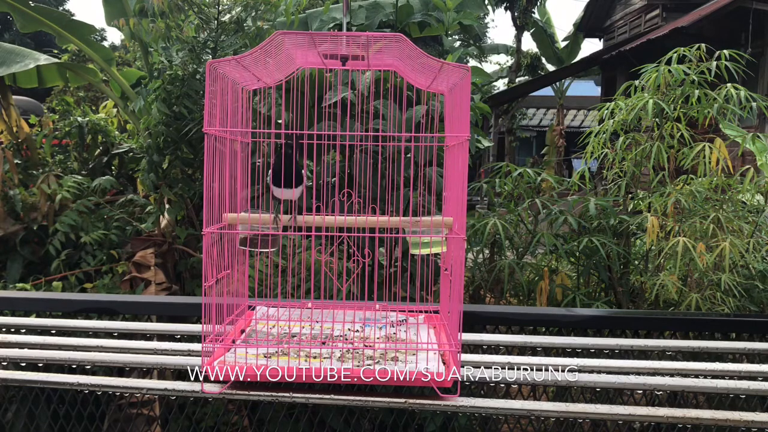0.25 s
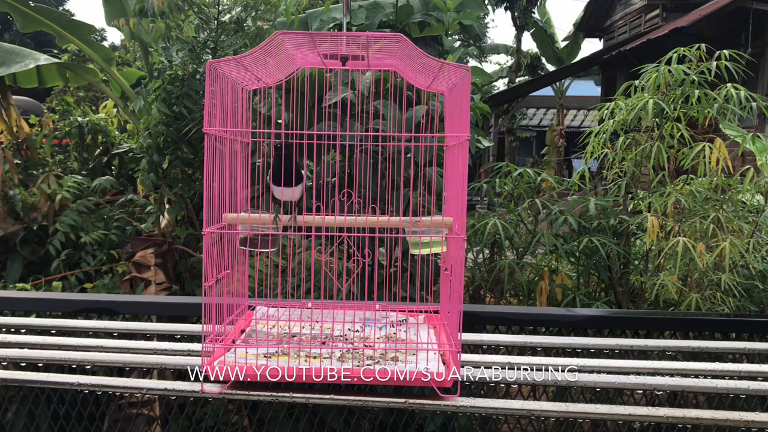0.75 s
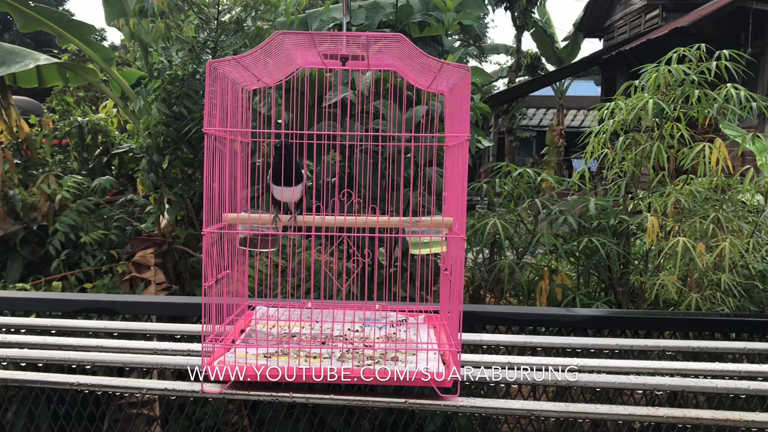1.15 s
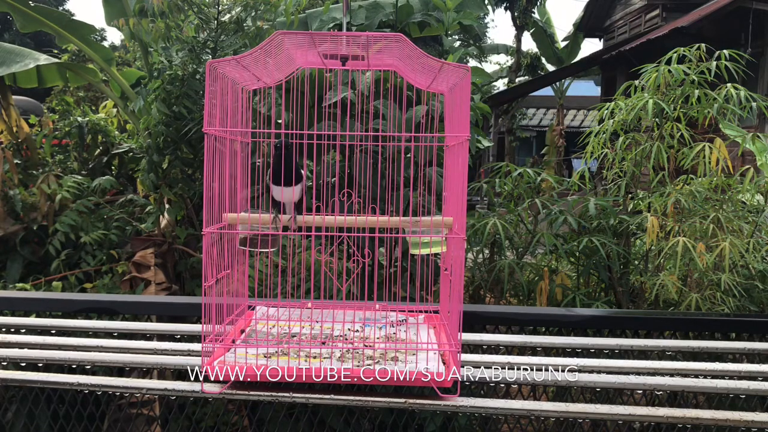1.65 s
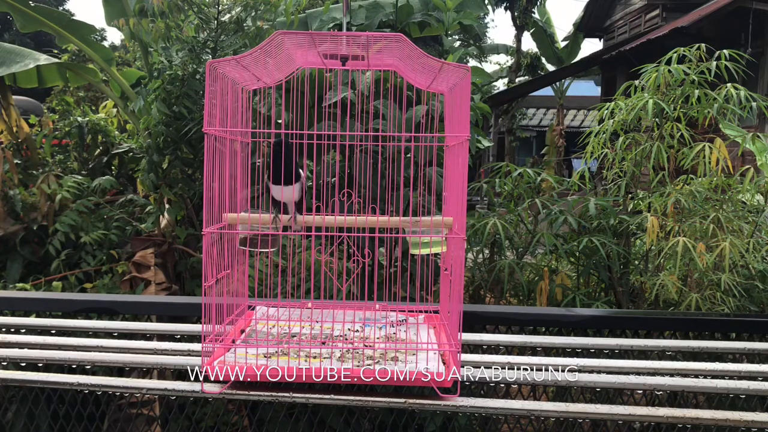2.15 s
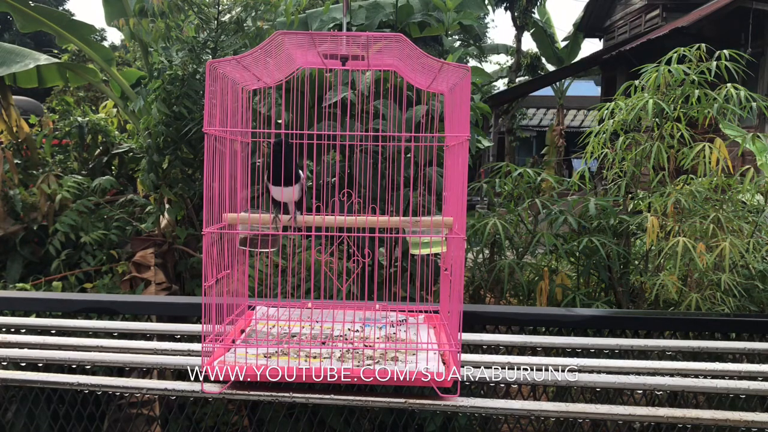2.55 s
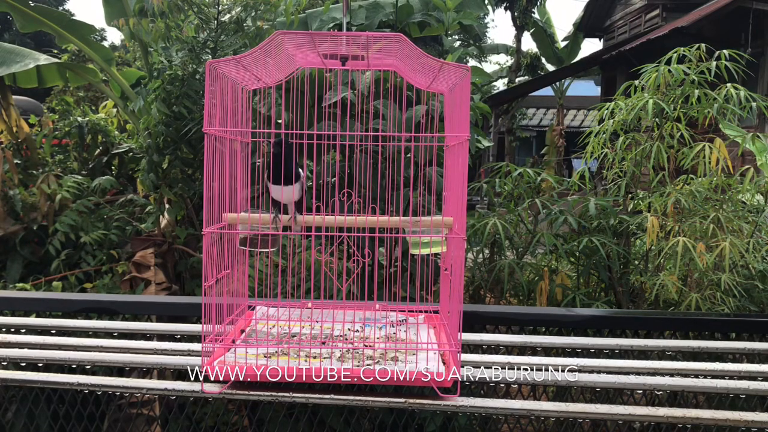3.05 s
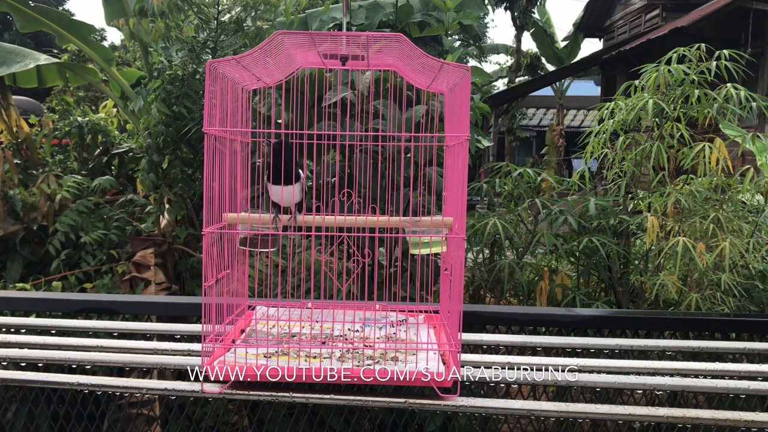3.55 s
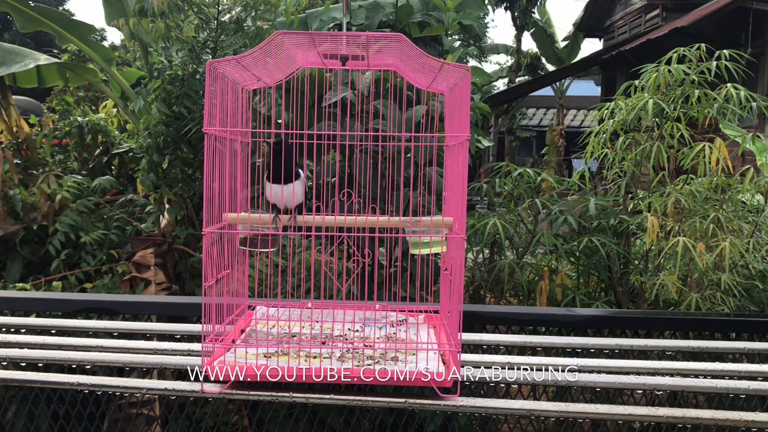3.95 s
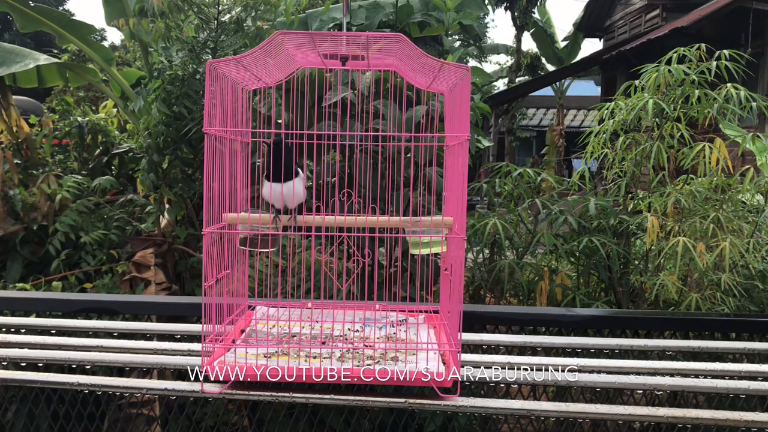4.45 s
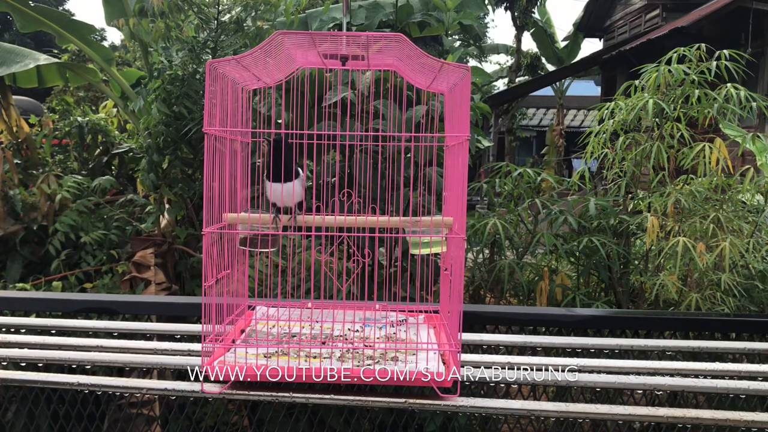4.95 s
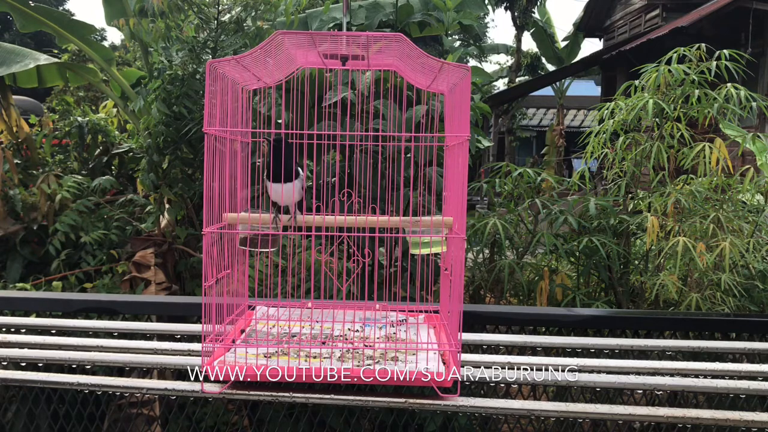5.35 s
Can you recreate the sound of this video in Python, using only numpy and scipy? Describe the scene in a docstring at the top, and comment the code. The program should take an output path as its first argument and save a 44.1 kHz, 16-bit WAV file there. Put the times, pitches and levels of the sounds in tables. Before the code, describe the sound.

Bright, fast whistles and warbles from a caged songbird outdoors, followed by one soft swish above a low, faraway traffic hum.

```python
"""A garden, one microphone a few metres from a caged magpie-robin singing one quick phrase.
The two sides of its syrinx whistle in turn and overlap, which adds sum and difference tones;
some notes flutter or rasp. The cage reflects them closely; house and foliage give a faint echo.
Distant traffic drones throughout, another bird calls far off, and one soft swish follows the song."""
import sys
import numpy as np
from scipy import signal
from scipy.fft import rfft, irfft, next_fast_len
from scipy.io import wavfile

SR = 44100
rng = np.random.default_rng(int(sys.argv[2]) if len(sys.argv) > 2 else 0)


def inscribe(sig):
    """Save sig as 16-bit PCM at rate SR to the path in sys.argv[1].

    A 1-D sig is mono; a 2-D sig holds one channel per row.
    Samples are clipped to [-1, 1] before scaling.
    """
    pcm = np.round(np.clip(np.atleast_2d(sig).T, -1, 1) * 32767)
    wavfile.write(sys.argv[1], SR, pcm.astype(np.int16))


N = 246959
TIME = np.arange(N) / SR


def undb(db):
    """Decibels to gain."""
    return 10 ** (np.asarray(db) / 20)


def curve(rows):
    """Rows of (time_s, value) joined by straight lines."""
    return np.interp(TIME, *np.transpose(rows))


def gain_at(hz, colour):
    """Gain of a (freq_hz, gain_db) spectrum at the given frequencies."""
    freq_hz, gain_db = np.transpose(colour)
    return undb(np.interp(np.log(np.maximum(hz, 1)), np.log(freq_hz), gain_db))


def gate(start, end, edge_s):
    """One between start and end, with smooth edges."""
    inside_s = np.minimum(TIME - start, end - TIME)
    return np.sin(np.pi / 2 * np.clip(inside_s / edge_s + .5, 0, 1)) ** 2


def wander(hz):
    """Unit random motion, slower than hz."""
    motion = signal.sosfilt(signal.butter(4, hz, fs=SR, output="sos"), rng.standard_normal(N + SR))[SR:]
    return motion / motion.std()


def noise(colour):
    """Unit noise with a (freq_hz, gain_db) colour, falling away below the first point."""
    size = next_fast_len(N)
    hz = np.arange(size // 2 + 1) * SR / size
    low_cut = np.minimum(hz / colour[0][0], 1) ** 2
    coloured = irfft(rfft(rng.standard_normal(size)) * gain_at(hz, colour) * low_cut, size)[:N]
    return coloured / coloured.std()


# Spectrum of the traffic, far from the garden: freq_hz, relative_db
RUMBLE_COLOUR = [(15, -41.5), (25, -15), (54, -4), (165, -2.5), (192, -8), (299, -13), (320, -14),
                 (350, -17), (488, -24), (521, -21.5), (794, -25.5), (1010, -20.5), (1930, -32),
                 (3000, -33), (5000, -40.5), (6500, -70), (11000, -120)]
# Tones of one distant engine: pitch_hz, relative_db
ENGINE_TONES = [(65, -55.5), (98, -54.5), (164, -61), (530, -73)]
# That engine's rise and fall at the microphone: time_s, gain_db
ENGINE_SWELL = [(0, 4), (.8, -16.5), (1.2, 3), (4.3, 6), (4.7, 0.5), (5.6, -3.5)]


def distant_traffic(rumble_db=-47.94, sway_db=.5, speed_drift=.0069, engine_db=-1):
    """A swaying rumble and a far engine whose tones drift together with its speed."""
    engine_time = np.cumsum(1 + speed_drift * wander(4)) / SR
    engine = sum(undb(db + 1.4 * wander(4.5)) * np.sqrt(2) * np.sin(2 * np.pi * hz * engine_time)
                 for hz, db in ENGINE_TONES)
    rumble = noise(RUMBLE_COLOUR) * undb(rumble_db - sway_db * wander(2.7))
    return rumble + engine * undb(engine_db + curve(ENGINE_SWELL))


# Spectrum of the garden's background hiss: freq_hz, relative_db
HISS_COLOUR = [(4000, -23.5), (5000, 3.5), (6500, 1), (7500, -1), (8600, -1), (9500, 6), (10500, -7.5),
               (11500, -0.5), (13000, 9), (14500, -2), (15700, -12)]


def hiss(level_db=-67):
    """A smooth, steady hiss high above the traffic."""
    return noise(HISS_COLOUR) * undb(level_db)


def whistle(start, end, first_hz, middle_hz, last_hz, db, attack_s, release_s, swell_db):
    """One arc of pitch on one breath: the samples it covers, its pitch and its amplitude."""
    on = np.flatnonzero((TIME > start) & (TIME < end))
    since, left = TIME[on] - start, end - TIME[on]
    along = since / (end - start)
    arc_hz = np.polyval(np.polyfit([0, .5, 1], [first_hz, middle_hz, last_hz], 2), along)
    scoop_hz = 147.5 * np.exp(-since / .004)  # flat while the air pressure builds
    sag_hz = 173 * np.exp(-left / .0045)  # flat again as it drops
    rise = np.sin(np.pi / 2 * np.minimum(since / attack_s, 1))
    fall = np.sin(np.pi / 2 * np.minimum(left / release_s, 1))
    return on, arc_hz - scoop_hz - sag_hz, rise * fall * undb(db + swell_db * (along - .5))


# The caged bird, a few metres away; notes of the low and high sides of its syrinx:
# start_s, end_s, start_hz, middle_hz, end_hz, level_db, attack_s, release_s, swell_db,
# overtones_db (before throat and beak), slope_db_per_harmonic
LOW_NOTES = [ (.028, .124, 3640, 3682, 3770, -18, 0.048, 0.017, -4, -11, -2),
             (.415, .438, 2670, 2920, 3010, -26.5, 0.046, 0.013, 11.5, 5, -7.5),
             (.458, .649, 2997, 3285, 3440, -18, 0.034, 0.023, 8.5, -9.5, -2.5),
             (.721, .848, 2817, 2474, 2584, -25, 0.056, 0.013, -2, -5.5, 0.5),
             (1.133, 1.168, 2800, 2600, 2655, -29.5, 0.025, 0.0036, -3.5, 1.5, -3.5),
             (1.172, 1.228, 2400, 2142, 2120, -29, .006, .014, -2.5, -5, 0.5),
             (1.216, 1.324, 2170, 2205, 2257, -30, 0.019, 0.029, -1, 2.5, 0),
             (1.706, 1.825, 1826, 2060, 1961, -26, 0.085, 0.042, 8, -3, 0.5),
             (1.909, 1.951, 1957, 2667, 2900, -27, 0.03, .0055, 11.5, 12, -1.5),
             (1.942, 1.986, 3340, 3157, 2506, -14.5, .015, .029, -2.5, -4.5, -6),
             (1.976, 2.098, 2879, 2722, 2887, -24.5, 0.0087, 0.0041, 4, -8.5, 1),
             (2.21, 2.294, 3297, 3392, 2706, -16.5, 0.03, .049, 12, -2.5, -2),
             (2.292, 2.372, 2160, 2241, 2154, -25.5, 0.016, 0.013, 1.5, -11, -0.5),
             (2.509, 2.587, 3115, 3577, 3797, -15.5, 0.048, 0.0043, 4.5, -3, -1.5),
             (2.583, 2.636, 3660, 3500, 3665, -17, 0.004, 0.0089, -4.5, 1.5, -1),
             (3.12, 3.18, 1940, 2082, 1983, -29, 0.037, .012, 1.5, -9, -3),
             (3.172, 3.291, 2204, 2294, 2453, -27.5, 0.013, .012, -2.5, -5.5, -1.5),
             (3.575, 3.718, 3704, 3703, 3754, -16, 0.04, 0.04, -3.5, -6.5, -0.5)]
HIGH_NOTES = [ (.078, .204, 4188, 4428, 4453, -17.5, 0.063, .028, 11.5, 1.5, -1.5),
              (.366, .39, 4230, 4200, 3940, -31, .014, 0.0084, 5, -2.5, 0),
              (.382, .485, 3760, 4040, 3880, -14.5, .08, 0.049, -7.5, -2.5, 1.5),
              (.468, .57, 3900, 3670, 3610, -28.5, .015, 0.0128, -2.5, -7.5, -12),
              (.583, .648, 3780, 3820, 3960, -38, .01, .008, 8, -1.5, -7),
              (.828, .928, 3485, 3293, 3550, -20, .033, .027, -7, -16, 0),
              (.909, 1.046, 3306, 3587, 3430, -17, .035, 0.03, -1.5, -10.5, -1),
              (1.224, 1.325, 2695, 3240, 3420, -26.5, .014, .0033, 10, -24, -10),
              (1.306, 1.479, 3444, 3442, 3575, -19, .033, 0.015, -1, -0.5, -3.5),
              (2.585, 2.779, 4370, 4391, 4476, -20.5, .004, 0.011, 3, 1.5, 7.5),
              (2.859, 2.916, 5420, 4800, 4700, -30, 0.0047, .008, 20, 10.5, -13),
              (2.908, 2.97, 4890, 4580, 3534, -21.5, .01, 0.0078, 8.5, 6.5, -2),
              (2.964, 3.016, 3710, 3625, 3630, -18, .016, 0.024, -3.5, -1, -1),
              (3.625, 3.712, 4640, 4420, 4333, -30.5, 0.025, 0.0099, 13, 5, -22),
              (3.704, 3.857, 4536, 4563, 4706, -20.5, 0.0095, 0.045, 13, 4, -7.5)]
# Flutters, from slow warble to buzz: start_s, end_s, rate_hz, depth_hz, dip_fraction
FLUTTERS = [(1.345, 1.485, 25, 47.7, 0.1), (1.974, 2.022, 88, 149.2, 0.1), (2.019, 2.078, 360, 139.4, 0.27),
            (2.511, 2.592, 25.8, 82.4, 0.08), (2.912, 2.954, 210, 265, 0.05), (2.958, 3.02, 146, 416, 0.29),
            (3.174, 3.286, 64, 45.1, 0.3), (3.557, 3.712, 12.1, 55.8, 0), (3.737, 3.862, 10, 127.5, 0.02)]
# Rasps, where the labia vibrate irregularly:
# start_s, end_s, roughness_fraction, scratch_db, sizzle_db (both relative to the whistle)
RASPS = [(0.126, .131, 0.21, -17, -26.5), (.46, .65, 0.07, -34.5, -39), (0.738, .778, 0, -16, -27),
         (0.805, 0.851, 0.04, -11.5, -24.5), (1.164, 1.174, 0.25, 4.5, -15),
         (1.222, 1.311, 0.03, -14, -15.5), (1.705, 1.747, 0.25, 2, -30), (1.935, 1.951, 0.12, -4, -34),
         (1.947, 2.105, 0.2, -25.5, -24), (2.288, 2.3, .1, 5, -20.5), (2.29, 2.369, 0.08, -29, -25),
         (2.556, 2.577, 0.2, -24, -35), (2.909, 3.005, 0.16, -33.5, -45), (3.181, 3.294, 0, -39.5, -20),
         (3.753, 3.763, 0.04, -22.5, -21)]


def syrinx_side(notes, tremble_hz=12, tremble_db=.94, shimmer_db=1, rasp_rate_hz=406):
    """One side's vibrating labia: pitch, phase, amplitude, overtone strength and overtone slope."""
    amplitude, hz, bright, slope = np.zeros((4, N))
    for *shape, overtones_db, slope_db in notes:
        on, pitch, breath = whistle(*shape)
        amplitude[on] += breath
        hz[on] += breath * pitch
        bright[on] += breath * undb(overtones_db)
        slope[on] += breath * slope_db
    # overlapping notes slur: pitch and colour pass over to the stronger one
    hz, bright, slope = np.array([hz, bright, slope]) / np.maximum(amplitude, 1e-12)
    uneven = .4 * wander(60)
    for start, end, rate_hz, depth_hz, dip in FLUTTERS:
        swing = gate(start, end, .014) * np.sin(2 * np.pi * rate_hz * (TIME - start) + uneven)
        hz += depth_hz * swing
        amplitude *= 1 + dip * swing  # weakest at the bottom of each swing
    # even clear notes tremble; rasps shake faster and smear each overtone into a band
    rough = sum(roughness * gate(start, end, .008) for start, end, roughness, _, _ in RASPS)
    phase = 2 * np.pi * np.cumsum(hz + tremble_hz * wander(250)) / SR + rough * wander(rasp_rate_hz)
    amplitude *= undb(tremble_db * wander(120)) * (1 + .7 * rough * wander(rasp_rate_hz))
    return hz, phase, amplitude, bright * undb(shimmer_db * wander(70)), slope


# How throat and beak colour the overtones: freq_hz, gain_db
BEAK_COLOUR = [(2000, -28), (4200, -12), (5500, -15), (6800, -21.5), (7700, -19), (8300, -29),
               (9000, -26.5), (9900, -26.5), (11000, -25.5), (12500, -20), (13300, -16.5), (13750, -28.5),
               (15200, -34)]


def song(low, high, sum_db=5, difference_db=-2, mixing_slope_db=-2.5, balance_power=.65):
    """Two whistles with weak overtones; while both sound, each modulates the other's airflow."""
    on = (low[2] != 0) | (high[2] != 0)  # either side has amplitude
    low_hz, low_phase, low_amp, low_bright, low_slope = np.array(low)[:, on]
    high_hz, high_phase, high_amp, high_bright, high_slope = np.array(high)[:, on]
    tone = low_amp * np.sin(low_phase) + high_amp * np.sin(high_phase)
    flow = np.hypot(low_amp, high_amp)
    # every further partial lies at m times the low pitch plus n times the high one
    for m, n in [(m, n) for m in range(-2, 8) for n in range(-2, 5) if m + n > 0]:
        order = abs(m) + abs(n)
        if order < 2 or (m * n != 0 and order > 6):
            continue
        if n == 0:
            amplitude = low_amp * low_bright * undb(low_slope * (order - 2))
        elif m == 0:
            amplitude = high_amp * high_bright * undb(high_slope * (order - 2))
        else:  # sum and difference tones need both sides at once
            balance = (abs(low_amp / flow) ** abs(m) * abs(high_amp / flow) ** abs(n)) ** balance_power
            if m * n > 0:
                strength = np.sqrt(low_bright * high_bright) * undb(sum_db)
            else:
                strength = undb(-min(m, n) * difference_db)
            amplitude = flow * balance * strength * undb(mixing_slope_db * (order - 3))
        hz = m * low_hz + n * high_hz
        colour = gain_at(hz, BEAK_COLOUR) * ((hz > 0) & (hz < SR / 2))
        tone += amplitude * colour * np.sin(m * low_phase + n * high_phase)
    out = np.zeros(N)
    out[on] = np.sqrt(2) * tone
    return out


def throat(voice, cutoff_hz=1650):
    """So small a throat radiates almost nothing below its lowest note."""
    return signal.sosfilt(signal.butter(5, cutoff_hz, "high", fs=SR, output="sos"), voice)


def cage_echo(bird, floor_lag_s=.0036, floor_db=-22, bars_db=-27, bars_t60_s=.06):
    """The floor's close reflection ripples the glides; bars and railing scatter a short, bright blur."""
    t = TIME[:SR // 20]
    bars = rng.standard_normal(len(t)) * undb(-60 * t / bars_t60_s)
    blur = signal.fftconvolve(bird, bars / np.sqrt(np.sum(bars ** 2)))[:N]
    return undb(floor_db) * np.interp(TIME - floor_lag_s, TIME, bird) + undb(bars_db) * blur


def garden_echo(sound, t60_s=.51, treble_t60_s=.33, treble_gain=.15, delay_s=.0073):
    """Scattered echoes from house and leaves; the treble dies first."""
    t = TIME[:SR]
    scatter = rng.standard_normal((2, SR)) * np.clip(t / delay_s - 1, 0, 1)
    dull = signal.sosfilt(signal.butter(4, 5000, fs=SR, output="sos"), scatter[0])
    tail = dull * undb(-60 * t / t60_s) + treble_gain * scatter[1] * undb(-60 * t / treble_t60_s)
    return signal.fftconvolve(sound, tail / np.sqrt(np.sum(tail ** 2)))[:N]


# Another bird, far from the microphone: start_s, end_s, start_hz, end_hz, relative_db
FAR_CALLS = [(0.066, 0.159, 1308, 1430, -50.5), (0.096, 0.215, 764, 794, -52),
             (0.233, 0.316, 1643, 1723, -50), (0.26, 0.33, 822, 845, -55),
             (2.181, 2.266, 1100, 1330, -54.5), (2.283, 2.362, 1435, 1580, -51.5),
             (2.31, 2.403, 1660, 1672, -51.5)]


def far_bird(direct_db=-5, echo_db=-11, waver_hz=22):
    """Soft gliding notes from far off, blurred by their echo."""
    calls = np.zeros(N)
    for start, end, first_hz, last_hz, db in FAR_CALLS:
        hz = np.interp(TIME, [start, end], [first_hz, last_hz]) + waver_hz * wander(120)
        calls += undb(db) * gate(start, end, .011) * np.sqrt(2) * np.sin(2 * np.pi * np.cumsum(hz) / SR)
    return undb(direct_db) * calls + undb(echo_db) * garden_echo(calls)


# The caged bird's scratch and sizzle as they leave the beak: freq_hz, relative_db
SCRATCH_COLOUR = [(2100, -26), (2800, 3.5), (3600, 7.5), (4400, -12), (5500, -13.5), (7200, -16.5),
                  (9000, -29), (15800, -42)]
SIZZLE_COLOUR = [(8500, -22.5), (11500, -4), (14500, -1.5), (15800, -7.5)]


def sputter(low_amp, high_amp, clash_scratch_db=-24, clash_sizzle_db=-33, grain_db=3, grain_hz=400):
    """Air sputters in rasps and two-voiced notes: a scratch near the whistle, a sizzle high above."""
    grains = undb(grain_db * wander(grain_hz))
    grains /= np.sqrt(np.mean(grains ** 2))
    flow = np.hypot(low_amp, high_amp)
    clash = np.sqrt(abs(low_amp * high_amp))  # both sides at once
    scratch, sizzle = clash * undb(clash_scratch_db), clash * undb(clash_sizzle_db)
    for start, end, _, scratch_db, sizzle_db in RASPS:
        rasp = flow * gate(start, end, .008)
        scratch += rasp * undb(scratch_db)
        sizzle += rasp * undb(sizzle_db)
    return grains * (scratch * noise(SCRATCH_COLOUR) + sizzle * noise(SIZZLE_COLOUR))


# A swish in the background, as it reaches the microphone: time_s, level_db
SWISH_LEVEL = [(4.55, -88.5), (4.72, -55.5), (4.81, -48), (4.87, -44.5), (4.94, -49.5), (5.03, -61),
               (5.2, -72)]
# Its spectrum: freq_hz, relative_db
SWISH_COLOUR = [(800, -17.5), (1800, -9), (2600, -4.5), (3400, 1.5), (4000, -3), (4700, -18), (6200, -16),
                (7800, -26), (9300, -16.5), (11000, -30.5), (13400, -19), (15500, -24)]


def swish():
    """One soft rush of noise that swells and fades."""
    return noise(SWISH_COLOUR) * undb(curve(SWISH_LEVEL))


def scene(echo_db=-27):
    """The caged bird and its echoes in front of the garden's other sounds, in mono."""
    low, high = syrinx_side(LOW_NOTES), syrinx_side(HIGH_NOTES)
    bird = throat(song(low, high) + sputter(low_amp=low[2], high_amp=high[2]))
    echoes = cage_echo(bird) + undb(echo_db) * garden_echo(bird)
    behind = far_bird() + swish() + distant_traffic() + hiss()
    return (bird + echoes + behind)[None]


def record(dry, top_hz=15600):
    """The recorder cuts the highest treble steeply."""
    return signal.sosfilt(signal.ellip(10, .1, 80, top_hz, fs=SR, output="sos"), dry)


dry = scene()
out = record(dry)
inscribe(out)
```